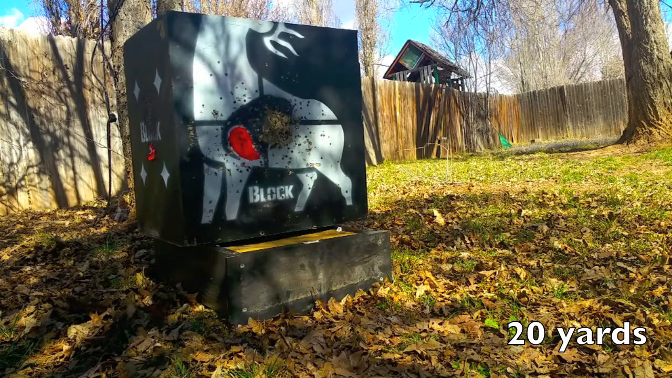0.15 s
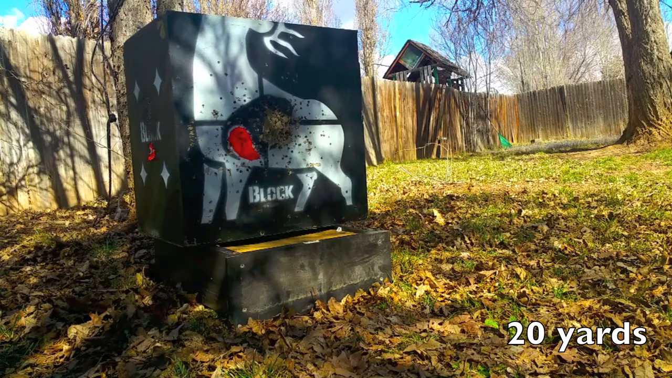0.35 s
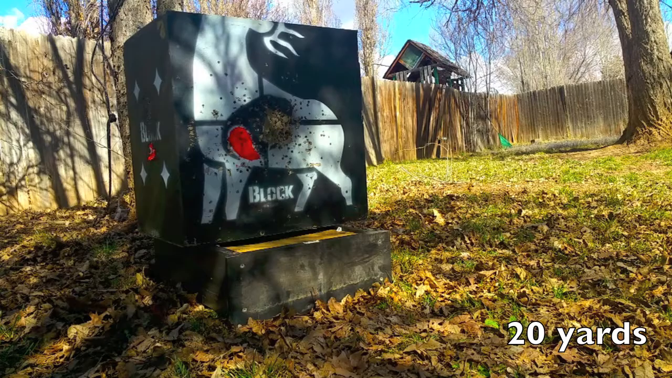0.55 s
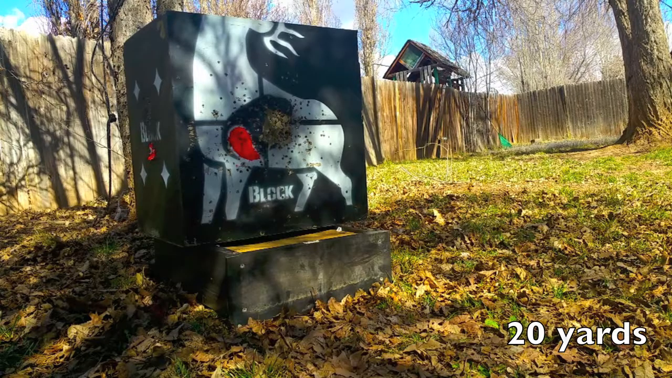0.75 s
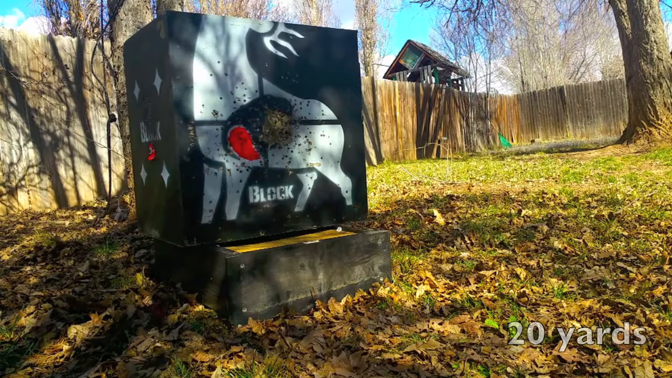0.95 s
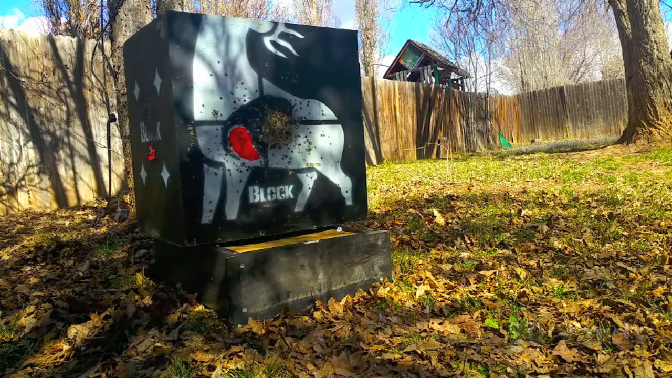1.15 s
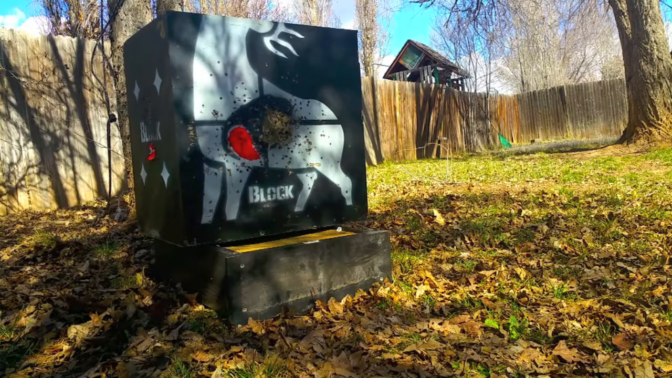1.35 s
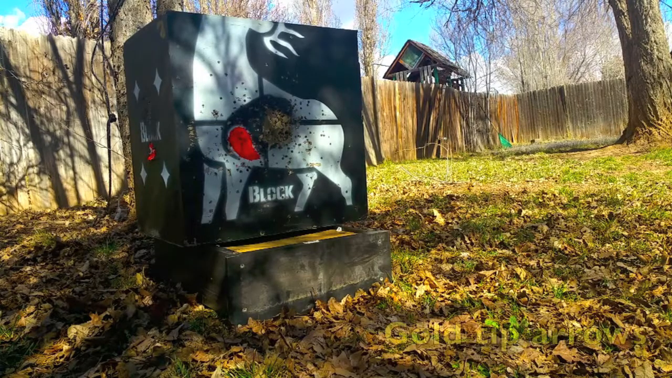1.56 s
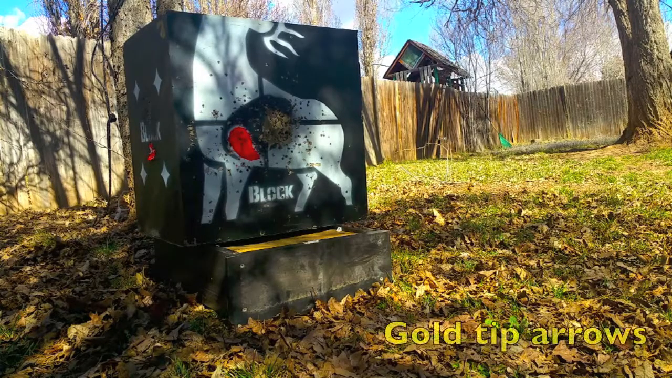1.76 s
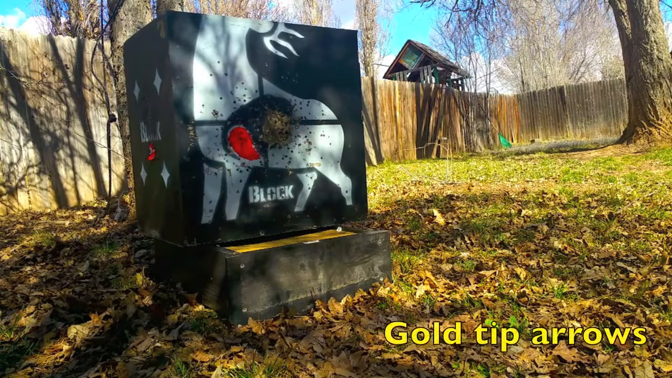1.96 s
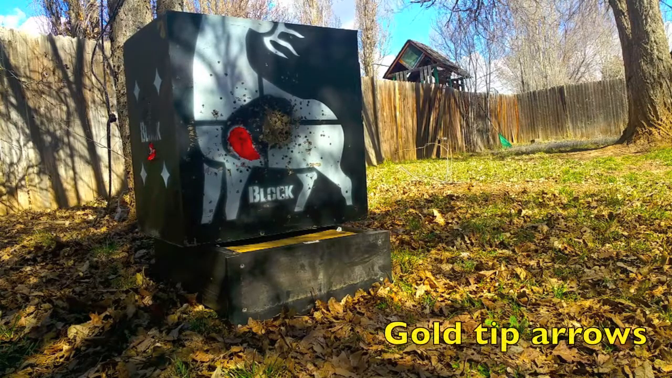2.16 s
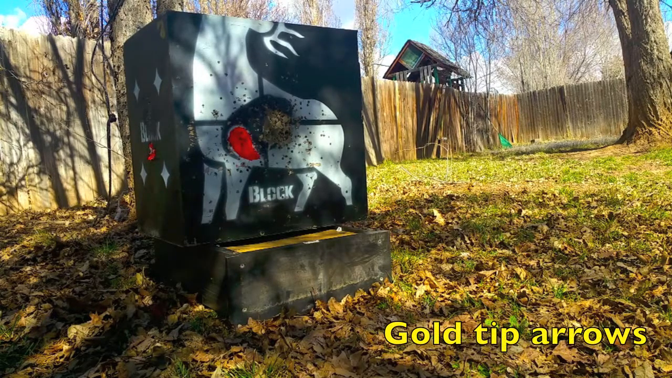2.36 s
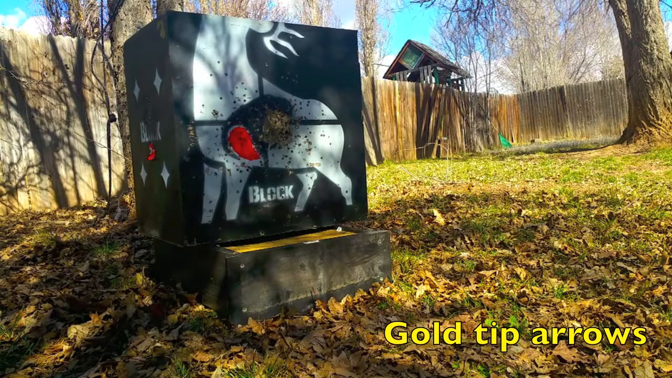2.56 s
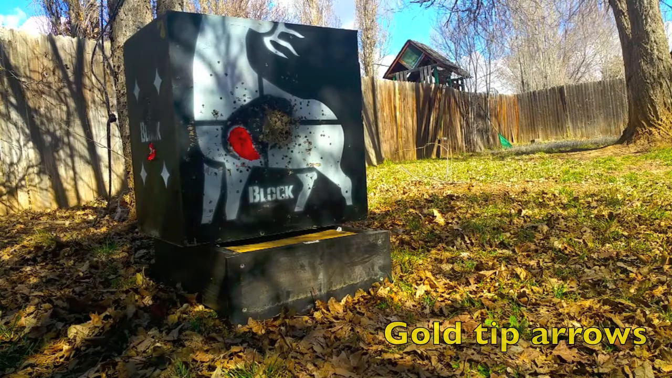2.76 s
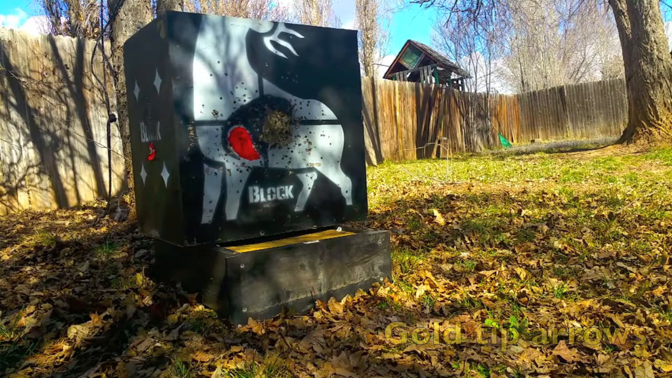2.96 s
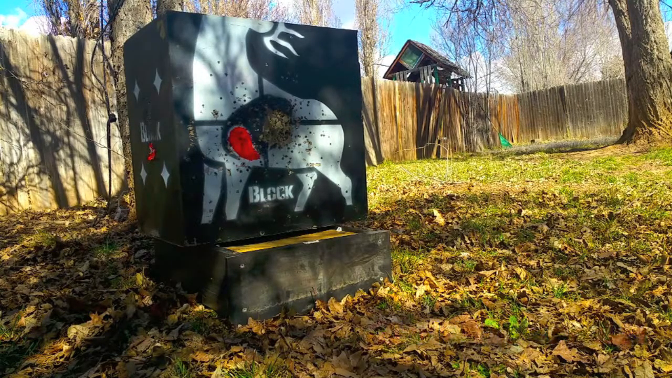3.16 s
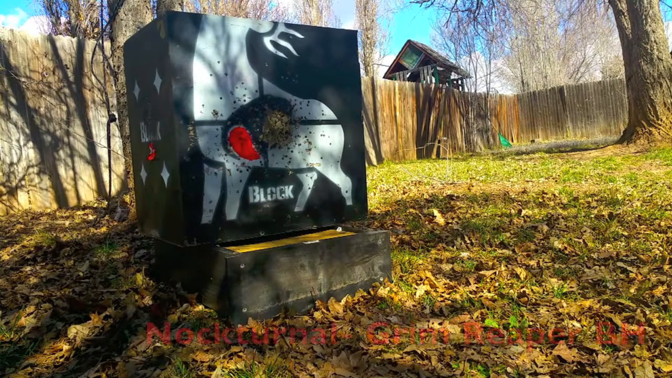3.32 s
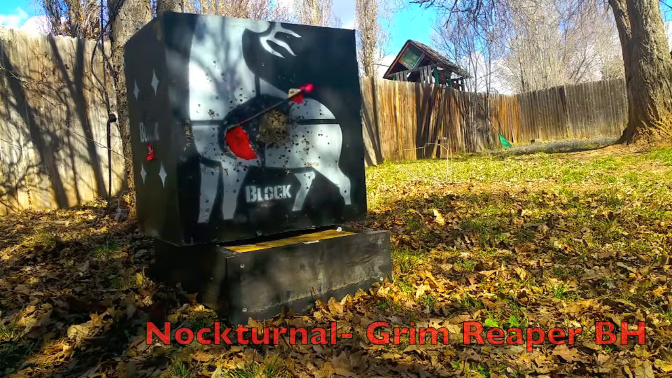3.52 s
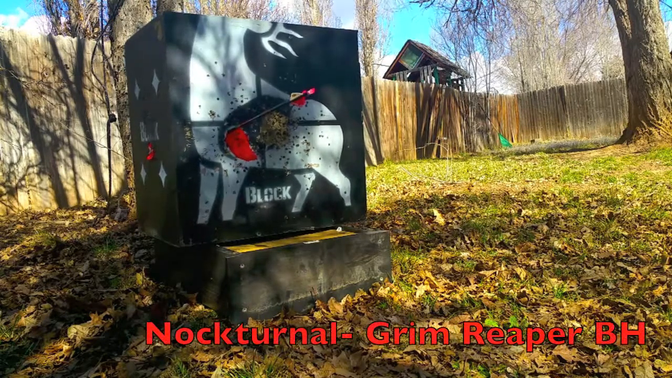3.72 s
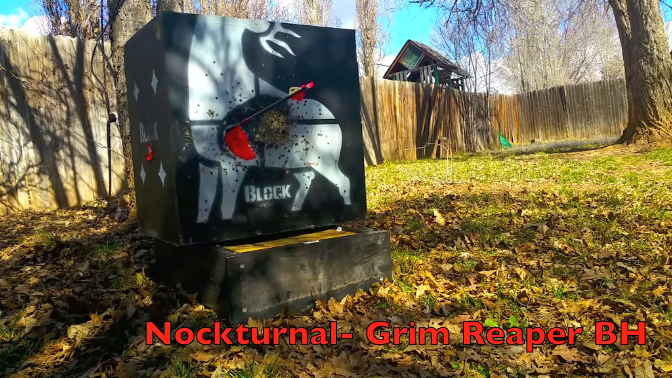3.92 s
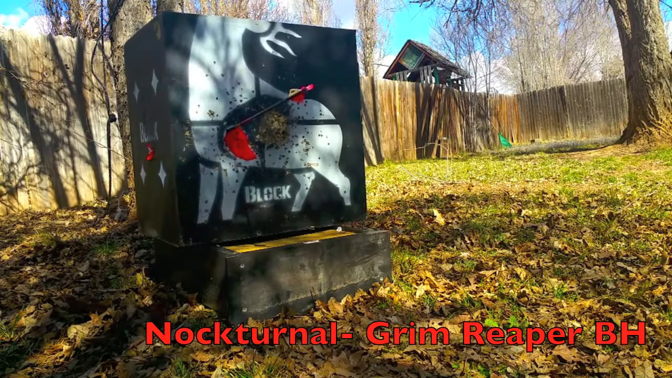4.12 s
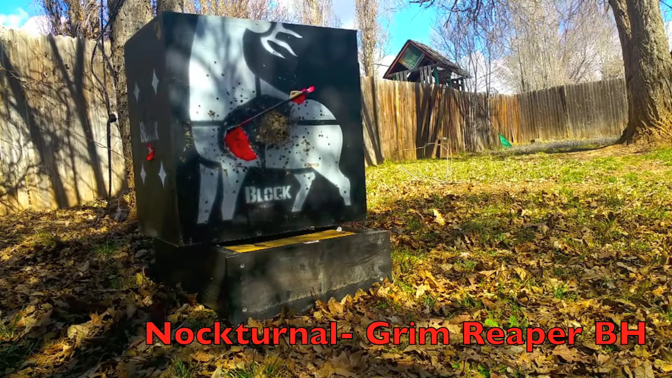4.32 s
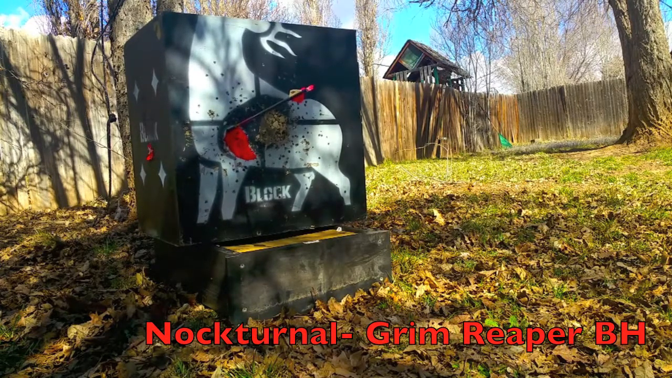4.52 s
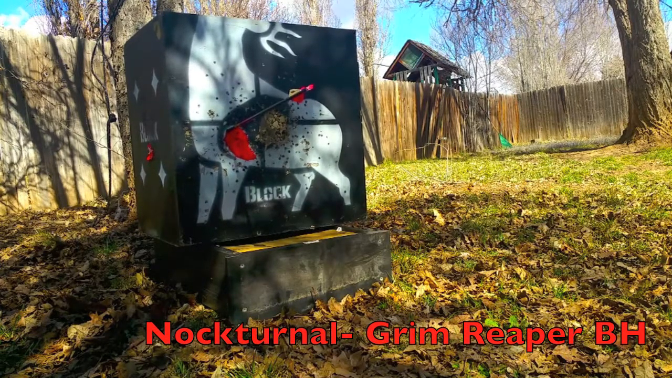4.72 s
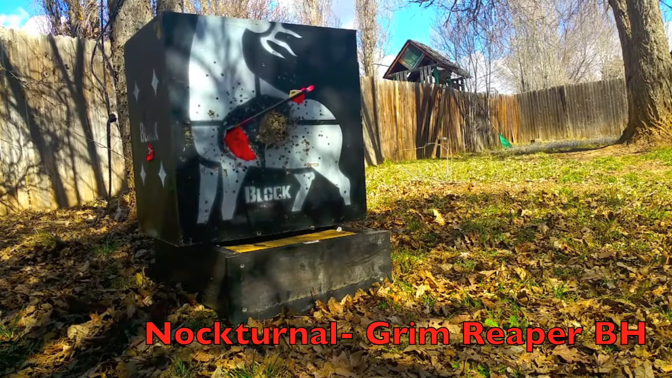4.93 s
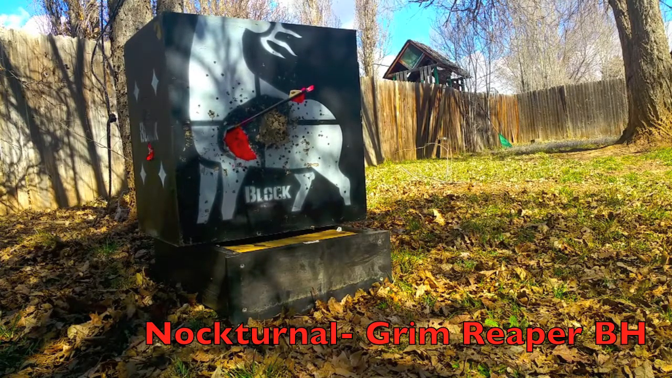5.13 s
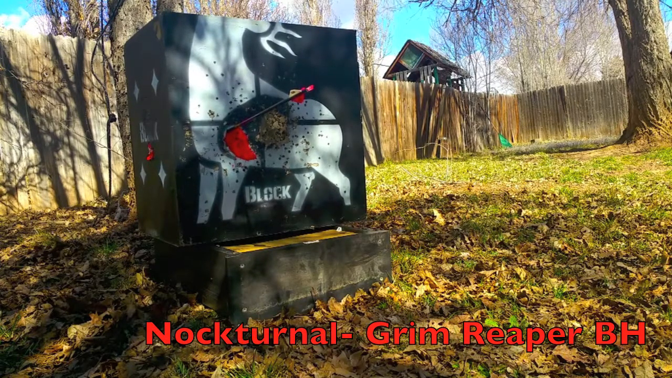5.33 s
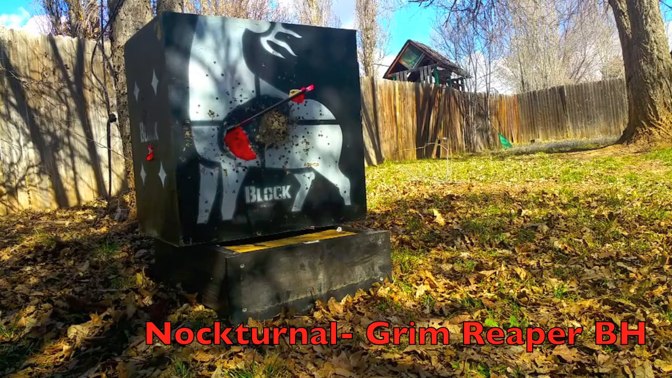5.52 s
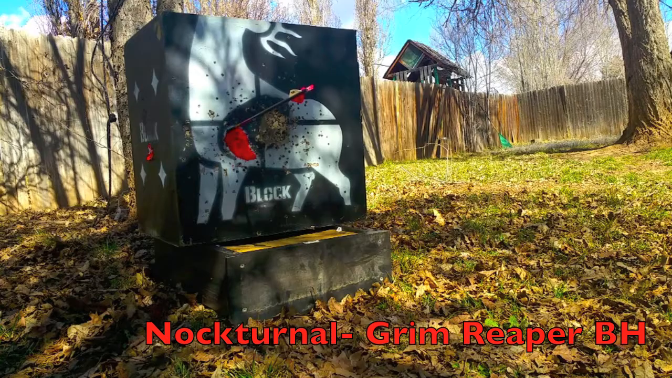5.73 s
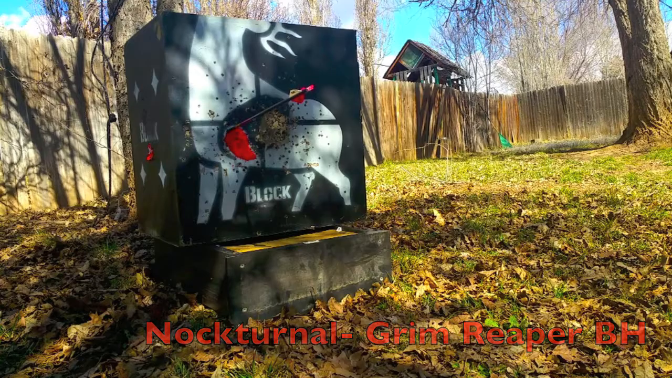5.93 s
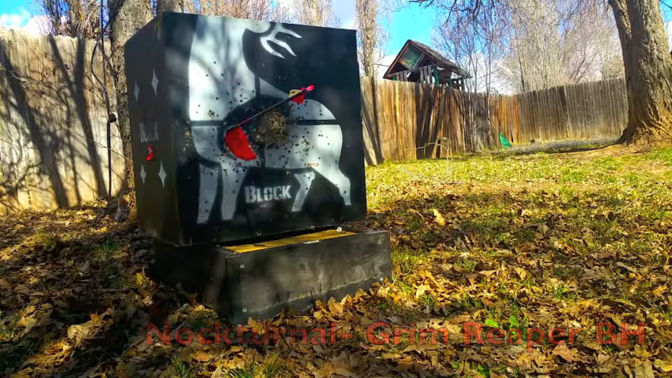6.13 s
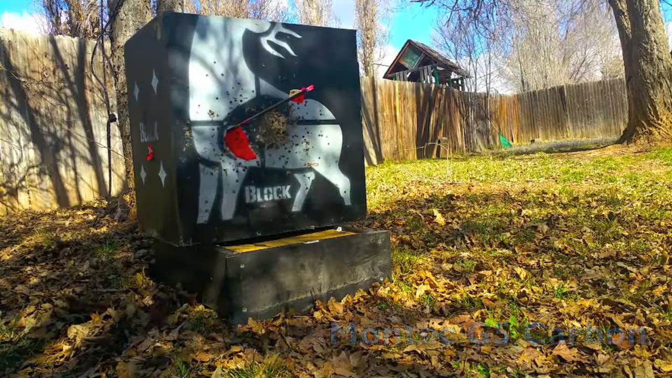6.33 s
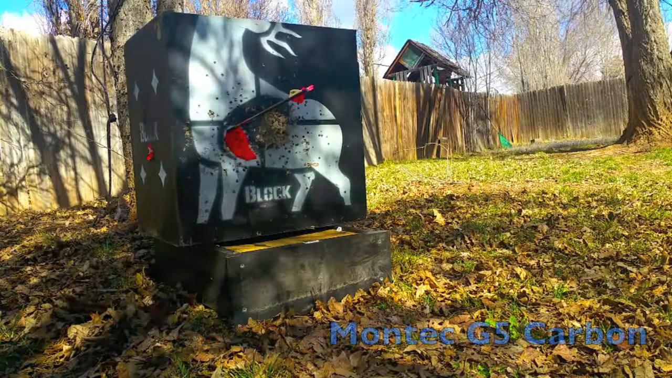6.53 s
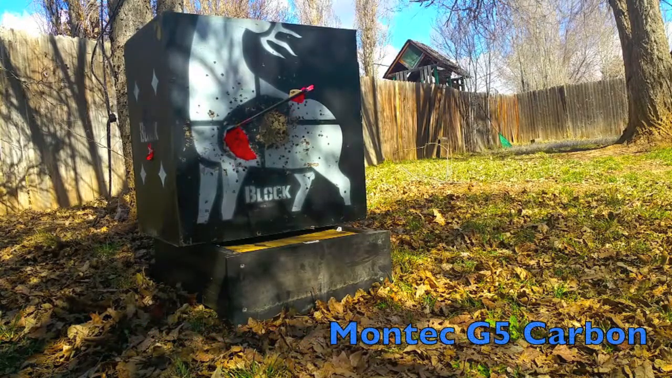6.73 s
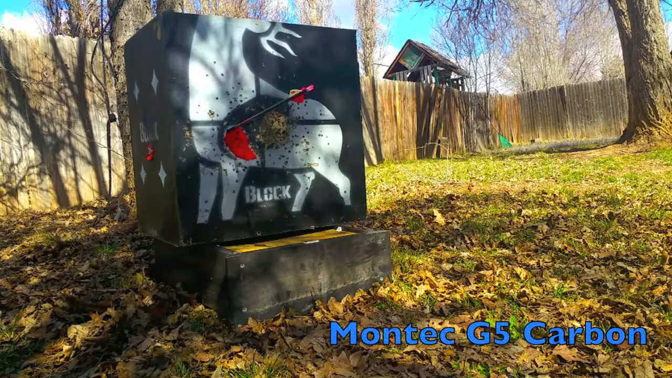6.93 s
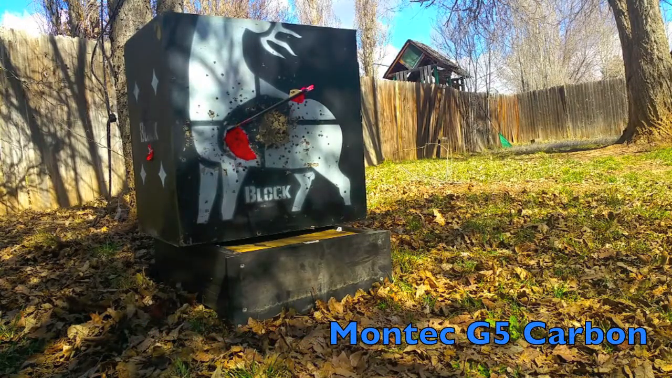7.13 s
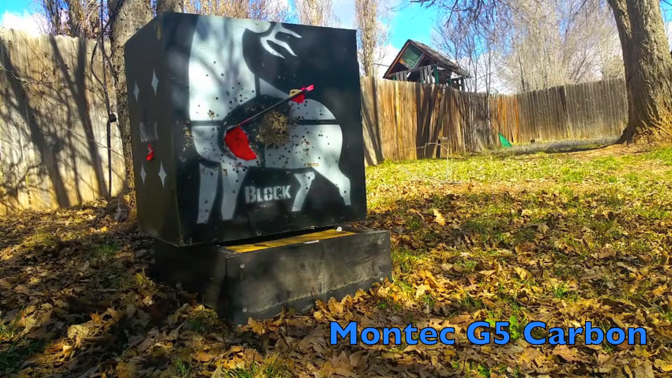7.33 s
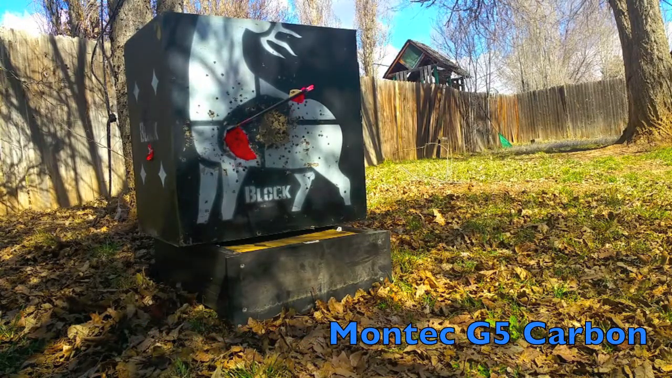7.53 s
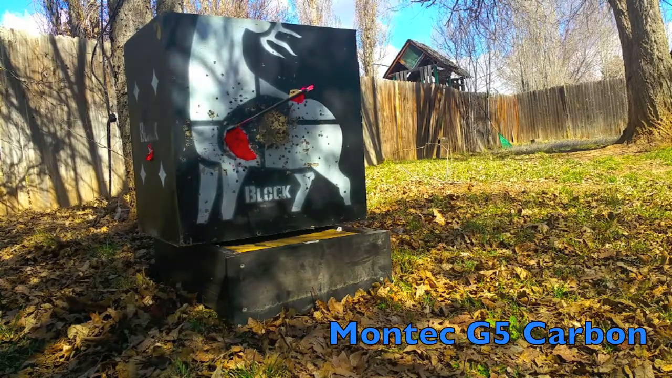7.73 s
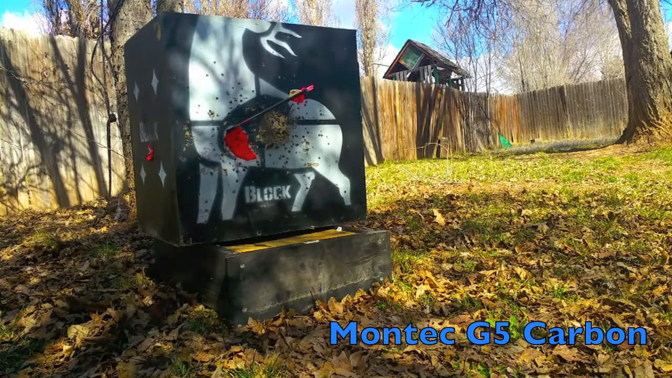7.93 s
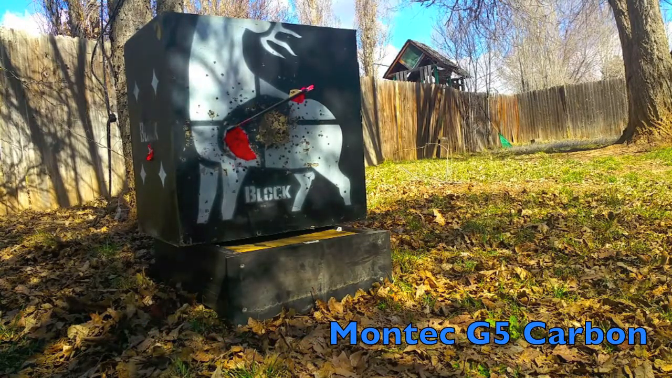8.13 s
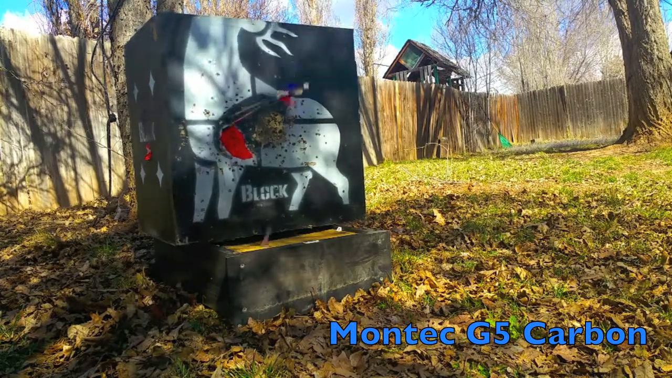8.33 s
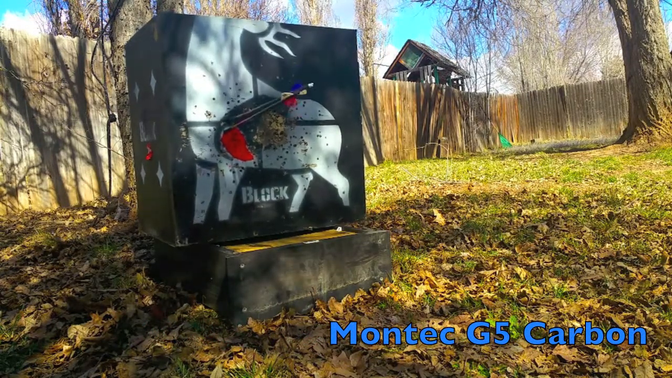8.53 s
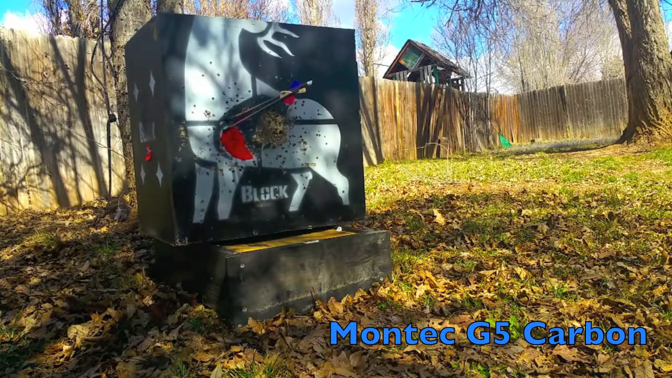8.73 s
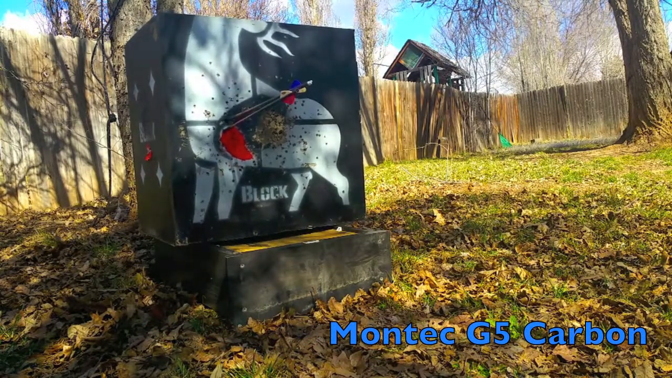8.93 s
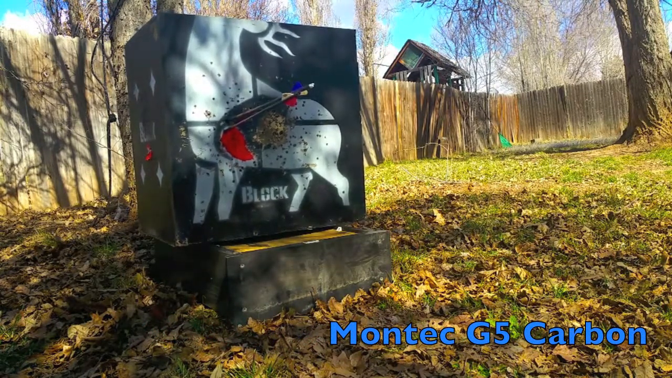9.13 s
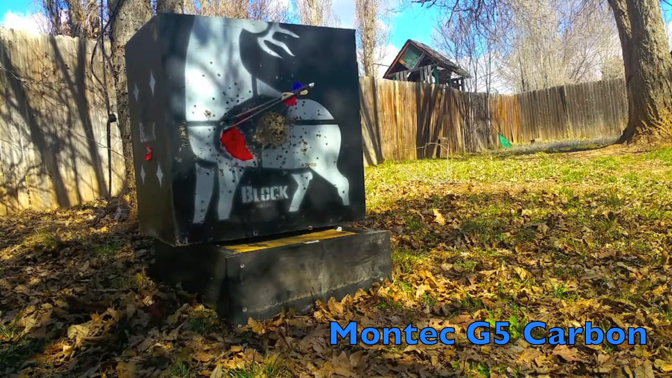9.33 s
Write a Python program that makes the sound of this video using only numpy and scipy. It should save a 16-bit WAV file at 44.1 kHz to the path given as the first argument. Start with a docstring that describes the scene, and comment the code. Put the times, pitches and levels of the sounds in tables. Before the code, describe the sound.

Two distant bow snaps, each followed by a brief hiss and a hard close foam thwack, amid birdsong, low traffic rumble and thin hiss.

```python
"""A songbird and farther birds whistle over traffic rumble and hiss, with one dry leaf tick.
Two arrows then hit a foam block next to the microphone in a fenced yard: a far bow snap (noise burst),
swelling vane hiss, and a thwack of pressure pulses, block modes, scrape and thud; each shaft quivers on.
The whole background's level drops after each hit, then rises again; between the shots it dips briefly,
an engine drone swells in and song returns. The second arrow rattles against the first; leaves tick."""
import sys
import numpy as np
from scipy import signal
from scipy.fft import rfft, irfft, next_fast_len
from scipy.io import wavfile

SR = 44100
rng = np.random.default_rng(int(sys.argv[2]) if len(sys.argv) > 2 else 0)


def pcm_store(signal):
    """Save signal as 16-bit PCM."""
    levels = np.round(np.clip(np.atleast_2d(signal), -1, 1) * 32767)
    wavfile.write(sys.argv[1], SR, levels.astype(np.int16).T)


N = 417627
TIME_S = np.arange(N) / SR


def from_db(db):
    """Decibels to gain."""
    return 10 ** (np.asarray(db) / 20)


def rms_one(x):
    """Scale to unit power."""
    return x / np.sqrt(np.mean(x ** 2) + 1e-20)


def t60_decay(t, t60_s):
    """Exponential decay by 60 dB in t60_s."""
    return np.exp(-np.log(1000) * t / t60_s)


def in_time(rows):
    """Each column of a curve at every sample."""
    s, *columns = np.transpose(rows)
    return [np.interp(TIME_S, s, column) for column in columns]


def at_hz(points, hz):
    """Read a table on a log-frequency axis."""
    f, value = np.transpose(points)
    return np.interp(np.log(np.maximum(hz, 1)), np.log(f), value)


def span(seconds):
    """Time axis of a short sound."""
    return np.arange(int(seconds * SR)) / SR


def add(out, s, sound):
    """Mix a sound in at time s."""
    start = int(round(s * SR))
    part = sound[..., :N - start]
    out[..., start:start + part.shape[-1]] += part


# Left-right correlation of diffuse sound. Each row: frequency in Hz, correlation from -1 to 1.
LIKENESS = [(60, 0.92), (130, .9), (290, .68), (640, .18), (1400, -0.2), (3000, -.05), (15000, 0)]


def noise(colour, size):
    """Coloured stereo noise, alike on both sides in the bass; rms 1."""
    padded = next_fast_len(size, real=True)
    hz = np.fft.rfftfreq(padded, 1 / SR)
    alike = np.clip(at_hz(LIKENESS, hz), -1, 1)
    mid, side = rfft(rng.standard_normal((2, padded))) * from_db(at_hz(colour, hz))
    spectra = np.sqrt(1 + alike) * mid + np.sqrt(1 - alike) * side * [[1], [-1]]
    return rms_one(irfft(spectra, padded)[:, :size])


def drift(rate_hz, size):
    """Random values at rate_hz, joined by lines; spread near 1."""
    steps = np.arange(size) / SR * rate_hz
    return np.interp(steps, np.arange(1024), rng.standard_normal(1024))


def pan(balance_db):
    """Left and right gains; positive favours the left."""
    return from_db([[balance_db / 2], [-balance_db / 2]])


def place(x, lag_ms, balance_db):
    """A point source; a positive lag reaches the left side later."""
    t = np.arange(len(x)) / SR
    left = np.interp(t - lag_ms / 1000, t, x, left=0)
    return np.array([left, x]) * pan(balance_db)


def resonate(x, hz, width_hz):
    """A two-pole resonance with gain near 1 on top."""
    r = np.exp(-np.pi * width_hz / SR)
    zeros = np.array([1, 0, -1]) * (1 - r * r) / 2
    poles = [1, -2 * r * np.cos(2 * np.pi * hz / SR), r * r]
    return signal.lfilter(zeros, poles, x)


# Jolts as a point bites and the shaft is stopped.
# Each row: time in seconds, pulse level in dB, pulse pitch in Hz, push on the block in dB.
JOLTS = [(3.6058, -.5, 1600, -19.5), (3.6088, -13.5, 898, -33.5), (3.6307, -21, 898, -35),
         (3.677, -32, 220, -42), (8.3667, -5, 1050, -21.5), (8.3745, -16.5, 520, -32.5),
         (8.3773, -18.5, 299, -25.5), (8.3912, -21.5, 450, -36)]
# Modes of the block. Each row: frequency in Hz, relative level in dB, t60 in seconds.
BLOCK_MODES = [(86, -11.5, 0.24), (122, -7, 0.16), (196.3, 1.5, 0.13), (411, -9.5, 0.2), (558, -10.5, 0.14),
               (628, -8, 0.1), (722, -13, 0.089), (885, -6, 0.07), (1105, 1.5, .07), (1335, -5.5, 0.036),
               (1495, -11.5, 0.098), (1948, -16.5, .09), (2198, -10, .07), (2873, -14.5, .06)]


def block(spread_db, build_cycles):
    """Each jolt dents the face, which springs back in one pressure pulse, and sets the block ringing."""
    out, t = np.zeros(N), span(.5)
    hz, mode_db, t60_s = np.transpose(BLOCK_MODES)[:, :, None]
    build = 1 - np.exp(-hz * t / build_cycles)
    modes = np.sin(2 * np.pi * hz * t) * t60_decay(t, t60_s) * build
    lead_s = .004   # the pulse is centred on the jolt
    for s, pulse_db, pulse_hz, push_db in JOLTS:
        phase = 2 * np.pi * pulse_hz * (span(2 * lead_s) - lead_s)
        add(out, s - lead_s, from_db(pulse_db) * phase * np.exp((1 - phase ** 2) / 2))
        reach = 1 / np.hypot(1, hz / (2 * pulse_hz))   # a soft jolt drives mainly the low modes
        ring_db = push_db + mode_db + spread_db * rng.standard_normal(hz.shape)
        add(out, s, (reach * from_db(ring_db) * modes).sum(axis=0))
    return place(out, lag_ms=-0.081, balance_db=-1)


# Arrows; levels apply before the envelopes. Each row: arrival in seconds, vane hiss in dB,
# seconds from passing the microphone to arrival, scrape in dB, scrape length in seconds,
# scrape left-right balance in dB, scrape tilt in dB per octave, sizzle in dB, thud in dB,
# thud t60 in seconds.
ARROWS = [(3.605, -34, .022, -14.7, .0036, 2, .5, -22, -20.5, .2),
          (8.3604, -34.5, 0.013, -15.5, 0.0051, 0, -0.5, -32, -18.5, .18)]
# Colours. Each row: frequency in Hz, relative level in dB per Hz.
SCRAPE_COLOUR = [(200, -11), (1000, 4), (2500, 4), (4300, -3.5), (6000, -2.5), (8000, -9.5), (11000, -8),
                 (15000, -8.5)]
SIZZLE_COLOUR = [(8000, -35), (11500, -0.5), (16000, -0.5)]
THUD_COLOUR = [(40, -8), (100, -2.5), (250, 0), (600, -2.5), (1200, -3.5), (2200, -13), (4000, -18),
               (6200, -18), (8000, -24), (16000, -25)]


def penetration(grain_db, stop_s, bite_db, bite_s, sizzle_balance_db, thud_balance_db):
    """The point cracks the skin and tears through foam in tiny slips; packed layers answer with a thud."""
    out, t = np.zeros((2, N)), span(0.56)
    size = len(t)
    for s, _, _, scrape_db, length_s, balance_db, tilt_db, sizzle_db, thud_db, thud_t60_s in ARROWS:
        colour = [(hz, db + tilt_db * np.log2(hz)) for hz, db in SCRAPE_COLOUR]
        slips = rms_one(from_db(grain_db * np.clip(drift(2700, size), -1, 1)))
        sliding = np.exp(-np.maximum(t - length_s, 0) / stop_s)
        sliding = sliding + from_db(bite_db) * np.exp(-t / bite_s)
        scrape = noise(colour, size) * slips * sliding
        sizzle = noise(SIZZLE_COLOUR, size) * slips * sliding
        add(out, s, from_db(scrape_db) * scrape * pan(balance_db))
        add(out, s, from_db(sizzle_db) * sizzle * pan(sizzle_balance_db))
        swell = np.minimum(t / (2 * length_s), 1) * t60_decay(t, thud_t60_s)
        thud = place(noise(THUD_COLOUR, size)[0], lag_ms=-.06, balance_db=thud_balance_db)
        add(out, s, from_db(thud_db) * swell * thud)
    return out


def radiate(x, cut_hz):
    """A small body moves little air at the lowest pitches."""
    highpass = signal.butter(2, cut_hz, "high", fs=SR, output="sos")
    return signal.sosfilt(highpass, x + 1e-18)


# Shafts tapping as they quiver; levels apply before the stereo blend.
# Each row: time in seconds, level in dB, ring pitch in Hz, ring above the tick in dB.
TAPS = [(3.6396, -28.5, 12930, -3), (3.693, -48.5, 1700, 11), (3.721, -45.5, 1490, 17),
        (3.765, -61, 3980, 11), (8.399, -31, 3280, -6), (8.478, -37, 1900, -4), (8.5245, -46.5, 3500, 4.5),
        (8.5732, -34, 2200, -7), (8.6396, -53, 2840, 0), (8.6912, -47.5, 3040, 3), (8.7531, -52.5, 2300, 3),
        (8.8077, -42, 2330, -3)]
# Each row: frequency in Hz, relative level in dB per Hz.
TICK_COLOUR = [(150, -9.5), (500, 1.5), (1200, 4.5), (3000, -2), (5000, -5), (6500, -6.5), (8500, -12),
               (16000, -10.5)]


def taps(tick_s, width_hz, buzz_db, buzz_s):
    """A quivering shaft chatters for a few milliseconds at each touch, then buzzes out."""
    out, t = np.zeros((2, N)), span(.15)
    for s, level_db, hz, ring_db in TAPS:
        chatter = noise(TICK_COLOUR, len(t))
        chatter = chatter + from_db(ring_db) * rms_one(resonate(chatter, hz, width_hz))
        touch = np.sqrt(t / tick_s) * np.exp((1 - t / tick_s) / 2)
        buzz = from_db(buzz_db) * np.exp(-t / buzz_s)
        add(out, s, from_db(level_db) * chatter * (touch + buzz))
    return .75 * out + 0.25 * out[::-1]   # narrower stereo


# Bow snaps; levels apply before the decays. Each row: time in seconds, snap in dB, yard ring in dB,
# limb ring pitch in Hz, limb ring above the snap in dB.
RELEASES = [(3.448, -32.5, -36.5, 3350, -5), (8.2135, -32.5, -36, 2200, -7)]
# Colours. Each row: frequency in Hz, relative level in dB per Hz.
VANE_COLOUR = [(100, -10), (600, 0), (1200, -4.5), (2400, 3), (4500, -4), (7000, -3), (10000, -6.5),
               (16000, -2)]
WAKE_COLOUR = [(200, -20), (600, -1.5), (1200, -7), (2400, 2.5), (6000, -3.5), (8000, -15), (16000, -20)]


def flight(near_s, balance_db, wake_db, wake_lag_s, behind_db):
    """Vane hiss grows as 1 / distance, peaks near the pass and falls behind; a shorter wake burst follows."""
    out, t = np.zeros((2, N)), span(.5)
    for (release_s, *_), (arrival_s, hiss_db, pass_s, *_) in zip(RELEASES, ARROWS):
        to_go_s = arrival_s - release_s - t
        gone = np.clip(1 - to_go_s / pass_s, 0, 1)
        distance = np.hypot(1, (to_go_s - pass_s) / near_s)
        wake_distance = np.hypot(1, (to_go_s - pass_s + wake_lag_s) / near_s)
        hiss = noise(VANE_COLOUR, len(t)) * from_db(behind_db * gone) / distance
        wake = from_db(wake_db) * noise(WAKE_COLOUR, len(t)) / wake_distance ** 8
        add(out, release_s, from_db(hiss_db) * (hiss + wake) * (to_go_s > 0))
    return out * pan(balance_db)


# Colours. Each row: frequency in Hz, relative level in dB per Hz.
BOW_COLOUR = [(200, -6), (900, -1), (2200, -3), (3300, 6.5), (4500, -8), (6500, -6), (9000, -10),
              (16000, -28)]
BOW_RING_COLOUR = [(150, -6), (600, -2), (1400, 3.5), (2400, 1.5), (4000, -7), (6300, -12), (8500, -23),
                   (16000, -27.5)]


def bow(snap_s, ring_s, limb_width_hz, latch_s, latch_db):
    """Far off to the right the latch clicks, the string snaps home and the yard rings around the archer."""
    out, t = np.zeros((2, N)), span(0.57)
    for s, snap_db, ring_db, limb_hz, limb_db in RELEASES:
        crack = noise(BOW_COLOUR, len(t))[0]
        crack = crack + from_db(limb_db) * rms_one(resonate(crack, limb_hz, limb_width_hz))
        snap = place(from_db(snap_db) * crack * np.exp(-t / snap_s), lag_ms=0.292, balance_db=-4.0)
        ringing = from_db(ring_db) * noise(BOW_RING_COLOUR, len(t)) * np.exp(-t / ring_s)
        add(out, s - latch_s, from_db(latch_db) * snap)
        add(out, s, snap + ringing)
    return out


# Yard reverberation. Each row: frequency in Hz, relative band level in dB.
YARD_LEVEL = [(100, -11.5), (400, -15), (1200, -16.5), (3000, -12.5), (6000, -10.5), (9000, -14.5),
              (15000, -17.5)]
# Each row: frequency in Hz, t60 in seconds.
YARD_T60 = [(100, 0.65), (500, 0.56), (1500, 0.62), (3000, .5), (6000, 0.24), (9000, .27), (15000, .22)]


def yard_response(build_s, lumpy_db):
    """Scatter from fences, trunks and leaves: each band dies at its own rate."""
    t, response = span(0.98), 0
    edges_hz = np.geomspace(50, 17000, 15)
    white = [noise([(20, 0), (20000, 0)], len(t)) for _ in range(2)]
    for k, (low, high) in enumerate(zip(edges_hz, edges_hz[1:])):
        hz = np.sqrt(low * high)
        bandpass = signal.butter(2, [low, high], "band", fs=SR, output="sos")
        band = signal.sosfilt(bandpass, white[k % 2])
        shape = (1 - np.exp(-(t / build_s) ** 2)) * t60_decay(t, at_hz(YARD_T60, hz))
        shape = shape * from_db(lumpy_db * drift(160, len(t)))   # separate surfaces answer in clumps
        response = response + band * from_db(at_hz(YARD_LEVEL, hz)) * shape / np.linalg.norm(shape)
    return response


def syllable(length_s, pitches_hz, waver, trill):
    """One whistle gliding through three pitches, fluttering in level and, with trill, in pitch."""
    t = span(length_s)
    along = t / length_s
    hz = np.polyval(np.polyfit([0, .5, 1], pitches_hz, 2), along)
    flutter = np.sin(2 * np.pi * (rng.uniform(45, 100) * t + rng.random()))
    hz = hz * (1 + waver * drift(250, len(t)) + trill * flutter)
    envelope = np.sin(np.pi * along) ** .4 * (1 + .3 * flutter)
    return envelope * np.sin(2 * np.pi * np.cumsum(hz) / SR)


# The songbird's notes; levels are relative within the song.
# Notes that sink and level off. Each row: start in seconds, start pitch in Hz, level in dB.
GLIDES = [(.04, 3650, -59.5), (.20, 4250, -62), (.53, 3900, -56.5), (.82, 4290, -55.5), (.995, 4250, -57),
          (1.49, 4400, -56.5), (1.635, 3400, -56), (7.05, 3600, -63), (7.41, 4250, -69), (7.58, 3350, -62),
          (8.08, 4280, -63)]
GLIDE_S, GLIDE_FALL_SHARE = .09, .125
# Notes that rise and level off. Each row: start in seconds, end pitch in Hz, level in dB.
RISES = [(.42, 3110, -57), (.665, 3770, -52.5), (.72, 3775, -50.5), (1.06, 3500, -51.5),
         (1.15, 3490, -51.5), (1.29, 3500, -48.5), (1.75, 3250, -51), (7.95, 3300, -61)]
RISE_S, RISE_SHARE = .06, .1   # the share is of the end pitch
# Near-level whistles. Each row: start in seconds, start pitch in Hz, level in dB, length in seconds.
WHISTLES = [(2.28, 3900, -70, .09), (6.51, 3750, -71, .11), (6.80, 4100, -76.5, .22),
            (7.11, 3020, -60.5, .09)]
WHISTLE_SAG_SHARE = .04
# Quick down-slurs. Each row: start in seconds, start pitch in Hz, level in dB, number of notes.
SLURS = [(.11, 3510, -61, 2), (0.334, 3450, -53, 2), (.86, 3470, -58, 1), (.945, 3430, -62, 2),
         (1.194, 3250, -47, 1), (1.366, 3150, -48.5, 2), (6.70, 3290, -64, 1), (7.275, 3090, -55.5, 1),
         (7.50, 3580, -59, 1), (7.655, 3295, -53, 2), (7.79, 3400, -60.5, 1), (7.855, 3150, -56, 1),
         (8.0, 3240, -58.5, 2)]
SLUR_S, SLUR_FALL_SHARE = .033, .22
PAIR_GAP_S, PAIR_STEP_SHARE = .037, .05   # the second slur comes later and starts lower
UPPER_VOICE_RATIO, UPPER_VOICE_DB = 1.1, -13   # other side of the syrinx, on all but the slurs


def singer(waver, glide_trill, rise_trill):
    """Burry two-voiced glides, rises and whistles, and quick single-voiced slurs without pitch trill."""
    out = np.zeros(N)
    straight, levelling = np.array([0, .5, 1]), np.array([0, .75, 1])
    notes = [(s, GLIDE_S, hz * (1 - GLIDE_FALL_SHARE * levelling), db, glide_trill)
             for s, hz, db in GLIDES]
    notes += [(s, RISE_S, hz * (1 - RISE_SHARE * (1 - levelling)), db, rise_trill)
              for s, hz, db in RISES]
    notes += [(s, length_s, hz * (1 - WHISTLE_SAG_SHARE * straight), db, rise_trill)
              for s, hz, db, length_s in WHISTLES]
    for s, length_s, pitches_hz, level_db, trill in notes:
        lower = syllable(length_s, pitches_hz, waver, trill)
        upper = syllable(length_s, UPPER_VOICE_RATIO * pitches_hz, waver, trill)
        add(out, s, from_db(level_db) * (lower + from_db(UPPER_VOICE_DB) * upper))
    for s, hz, level_db, count in SLURS:
        for k in range(round(count)):
            pitches_hz = hz * (1 - PAIR_STEP_SHARE * k) * (1 - SLUR_FALL_SHARE * straight)
            slur = syllable(SLUR_S, pitches_hz, waver, trill=0)
            add(out, s + k * PAIR_GAP_S, from_db(level_db) * slur)
    return out


# Farther birds. Each row: start in seconds, end in seconds, pitch ceiling in Hz,
# level in dB before the direct sound is halved.
CHORUS = [(0, 1.75, 4187, -64), (2.0, 2.45, 4190, -73), (2.5, 3.7, 3910, -80.5), (4.9, 6.25, 3850, -75.5),
          (6.5, 8.2, 4200, -72.5)]
CHIRPS_PER_S = 21


def birds(song_db, trees_t60_s, wet_db):
    """A near singer, and down-slurs of farther birds that arrive mostly as echoes from the trees."""
    near = from_db(song_db) * singer(waver=.008, glide_trill=.032, rise_trill=.013)
    far, t = np.zeros(N), span(1)
    for start_s, end_s, top_hz, level_db in CHORUS:
        for s in np.arange(start_s, end_s, 1 / CHIRPS_PER_S):
            late_s, length_s, register, fall = rng.uniform([0, .02, .8, .75], [.04, 0.041, 0.99, .92])
            pitches_hz = top_hz * register * fall ** np.array([0, .5, 1])
            chirp = syllable(length_s, pitches_hz, waver=0.014, trill=0.024)
            add(far, s + late_s, from_db(level_db) * chirp)
    trunks = rng.random((2, len(t))) < 220 / SR   # about 220 trunks per second each return a copy
    trees = trunks * rng.choice([-1, 1], trunks.shape) * t60_decay(t, trees_t60_s)
    trees = trees / np.linalg.norm(trees[0])
    echoes = signal.fftconvolve((from_db(wet_db) * near + far)[None], trees, axes=1)[:, :N]
    return place(near + far / 2, lag_ms=-0.22, balance_db=2.0) + echoes


# Dry leaves. Each row: time in seconds, level in dB before the decay.
LEAVES = [(1.978, -53.5), (9.0017, -63), (9.0905, -59), (9.186, -65), (9.305, -65), (9.3798, -71)]


def leaves(tick_s):
    """Single dry leaves crackle on the ground, each a decaying noise tick."""
    out, t = np.zeros((2, N)), span(.03)
    for s, level_db in LEAVES:
        add(out, s, from_db(level_db) * noise(TICK_COLOUR, len(t)) * np.exp(-t / tick_s))
    return out


# Drone level, which then holds. Each row: time in seconds, level in dB before the trim.
DRONE_LEVEL = [(6.8, -54), (7.11, -44), (7.568, -52), (8.2, -52)]
DRONE_HZ, DRONE_FROM_S, DRONE_SWELL_S, DRONE_TRIM_DB = 99, 6.6, 0.23, -1


def engine(waver_hz, wander_hz, throb_db):
    """One low, unsteady line from a far engine swells in."""
    level_db, = in_time(DRONE_LEVEL)
    swell = np.clip((TIME_S - DRONE_FROM_S) / DRONE_SWELL_S, 0, 1)
    hz = DRONE_HZ + waver_hz * drift(14, N) + wander_hz * drift(1.993, N)
    tone = np.sqrt(2) * np.sin(2 * np.pi * np.cumsum(hz) / SR)
    return swell * from_db(DRONE_TRIM_DB + level_db + throb_db * drift(14, N)) * tone * pan(-1)


# Colours. Each row: frequency in Hz, relative level in dB per Hz.
TRAFFIC_COLOUR = [(12, -44.5), (20, -16), (27, -17.5), (65, -3), (147, -1), (181, -5.5), (228, -4.5),
                  (376, -13), (455, -13), (538, -13), (927, -12.5), (1170, -18), (2150, -35.5),
                  (3000, -44.5), (3900, -69), (6600, -120)]
AIR_COLOUR = [(1000, -8.5), (2500, 5), (4500, 0.5), (6200, 1.5), (8000, -2.5), (12000, -1.5), (16000, -2)]
# Level drops of the whole background after each hit.
# Each row: start in seconds, depth in dB, hold in seconds.
LEVEL_DROPS = [(3.601, 9.5, .58), (8.495, 4.7, .15)]
DROP_S, RECOVER_S, HISS_FOLLOWS_SHARE = 0.51, 0.55, .92   # the hiss follows this share of the depth
TRAFFIC_START_DB, TRAFFIC_EASES_DB_PER_S, HISS_DB = -45.6, 0.2, -70.5
DIP_S, DIP_FADE_S, DIP_FLOOR_DB = 6.345, 0.091, -29


def background(waver_db):
    """Traffic rumble and thin hiss; their level drops after each hit and dips briefly between shots."""
    drop_db = 0
    for s, depth_db, hold_s in LEVEL_DROPS:
        corners_s = s + np.cumsum([0, DROP_S, hold_s, RECOVER_S])
        drop_db = drop_db + depth_db * np.interp(TIME_S, corners_s, [0, 1, 1, 0])
    dip = np.clip(np.abs(TIME_S - DIP_S) / DIP_FADE_S, from_db(DIP_FLOOR_DB), 1)
    traffic_db = TRAFFIC_START_DB - TRAFFIC_EASES_DB_PER_S * TIME_S - drop_db + waver_db * drift(9, N)
    traffic = from_db(traffic_db) * noise(TRAFFIC_COLOUR, N)
    hiss = from_db(HISS_DB - HISS_FOLLOWS_SHARE * drop_db) * noise(AIR_COLOUR, N)
    return dip * (traffic * pan(-.8) + hiss * pan(-1.6))


def scene():
    """The shots, their scatter in the yard, and the life around it."""
    foam = penetration(grain_db=4.5, stop_s=.0019, bite_db=-1.5, bite_s=.0007,
                       sizzle_balance_db=13, thud_balance_db=-0.4)
    hits = radiate(block(spread_db=1.5, build_cycles=0.61) + foam, cut_hz=48)
    rattle = taps(tick_s=0.00074, width_hz=450, buzz_db=-12.5, buzz_s=.015)
    passing = flight(near_s=0.013, balance_db=-3.0, wake_db=0.5, wake_lag_s=0.011, behind_db=-7.5)
    shots = hits + rattle + passing
    scatter = signal.fftconvolve(shots, yard_response(build_s=0.017, lumpy_db=1.7), axes=1)[:, :N]
    archer = bow(snap_s=0.0035, ring_s=0.072, limb_width_hz=450, latch_s=0.017, latch_db=-29)
    song = birds(song_db=-.2, trees_t60_s=.36, wet_db=-6)
    drone = engine(waver_hz=3, wander_hz=1.5, throb_db=2.5)
    around = background(waver_db=.5) + drone + leaves(tick_s=0.0032)
    return shots + scatter + archer + around + song


CUTOFF_HZ = 16000


def record(dry):
    """Peaks beyond full scale clip; a steep low-pass cuts the top."""
    lowpass = signal.ellip(10, .1, 70, CUTOFF_HZ, fs=SR, output="sos")
    return signal.sosfilt(lowpass, np.clip(dry, -1, 1))


dry = scene()
out = record(dry)
pcm_store(out)
```